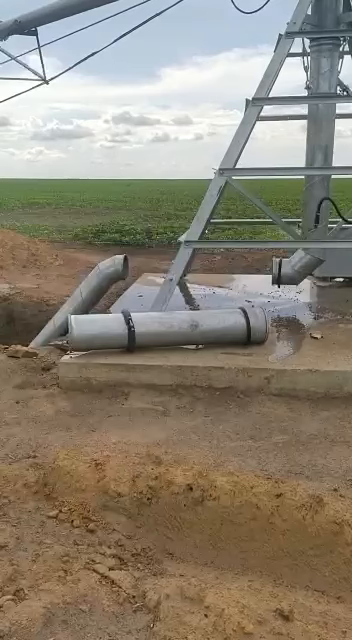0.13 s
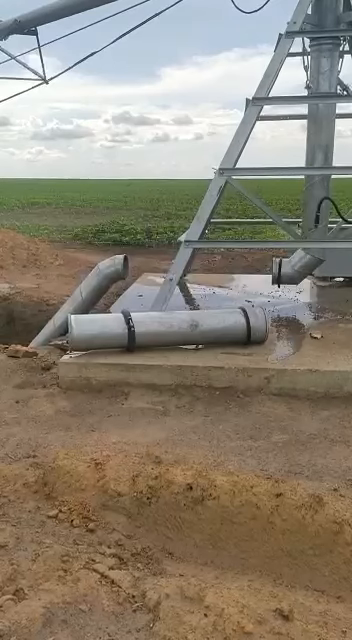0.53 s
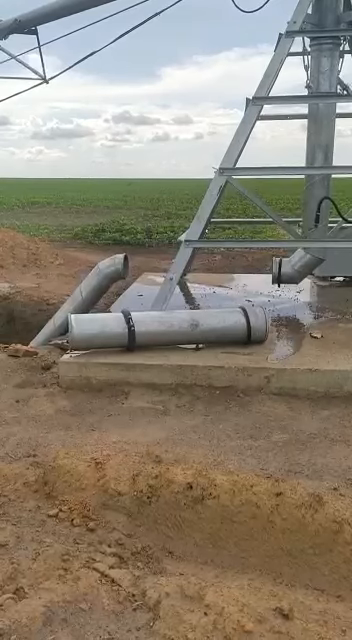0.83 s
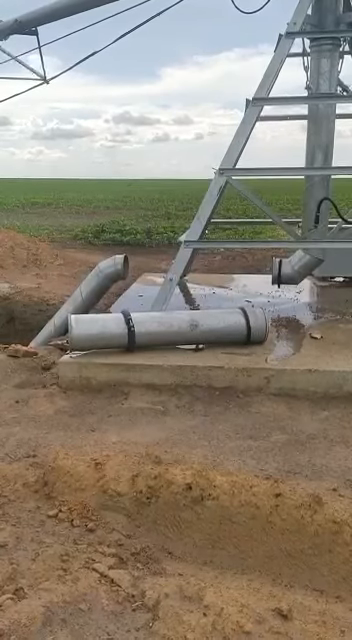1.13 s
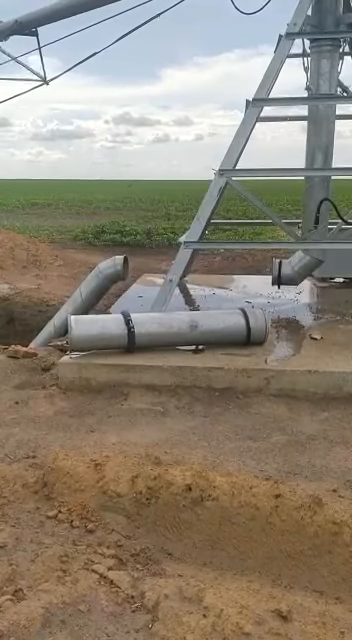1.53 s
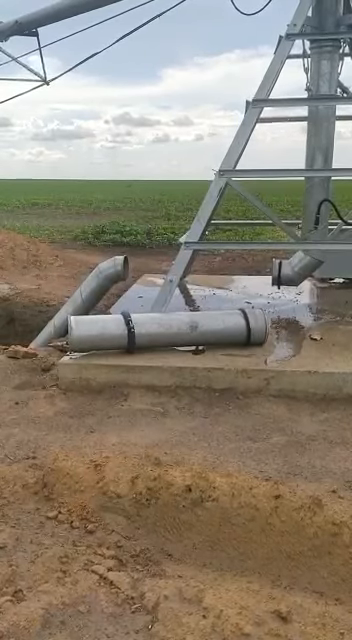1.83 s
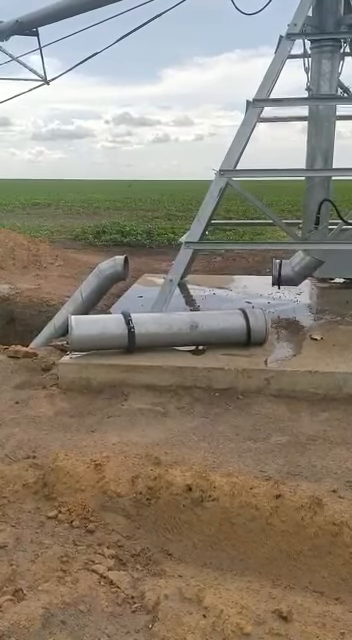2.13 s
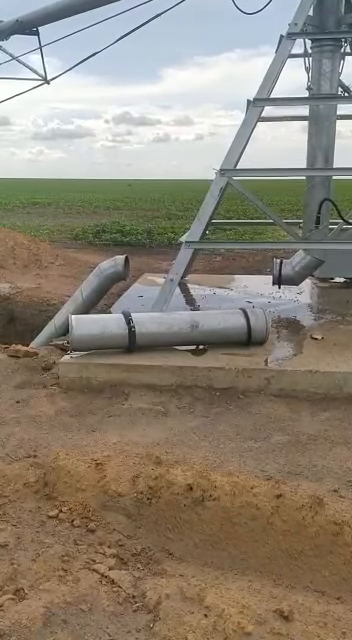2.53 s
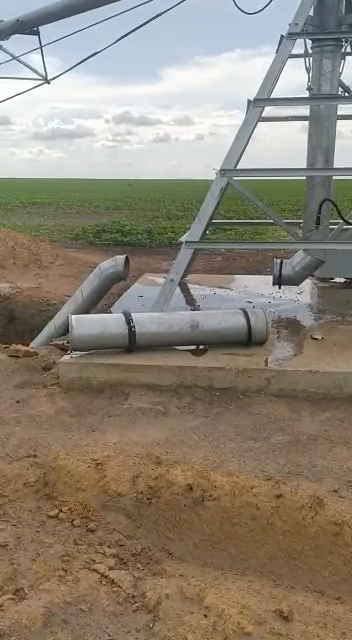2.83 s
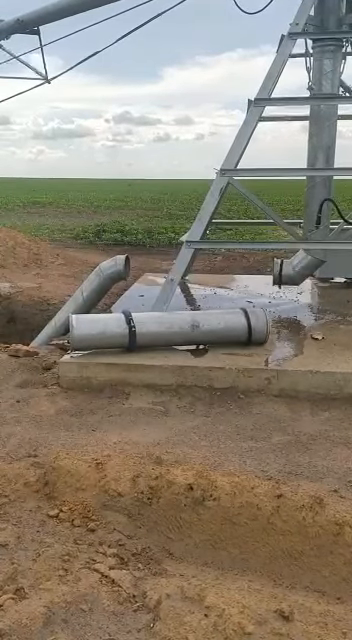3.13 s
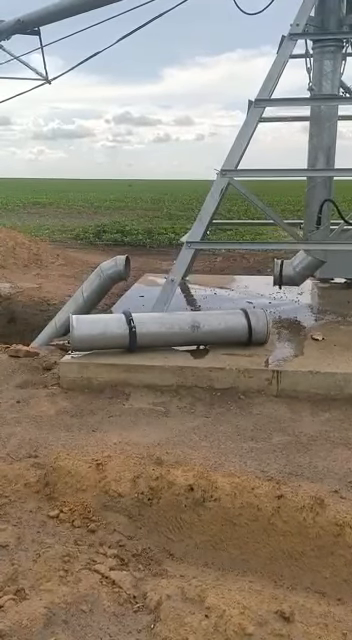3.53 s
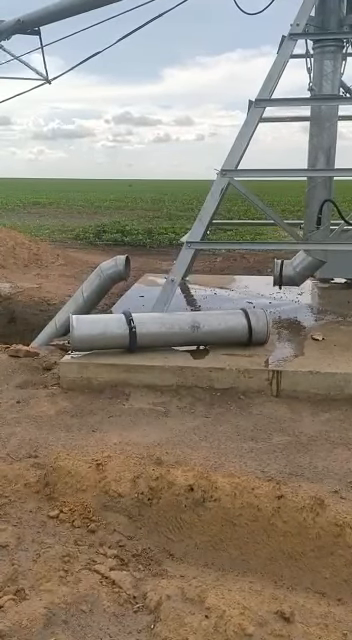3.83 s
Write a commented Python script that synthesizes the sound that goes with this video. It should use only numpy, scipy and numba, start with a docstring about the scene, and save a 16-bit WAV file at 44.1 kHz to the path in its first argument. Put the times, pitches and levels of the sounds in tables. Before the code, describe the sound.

Gusty wind buffets the microphone in an open field, mostly on the right, over a faint hiss of air from an irrigation pipe; the hiss swells briefly, then fades as hard, clipped wind thumps take over.

```python
"""Open field beside irrigation pipework, about four seconds: gusty wind, made of moving-filtered noise,
buffets the right microphone port from the start, over the faint hiss of air from a pipe mouth and a soft hush.
A first spit comes at 1.3 s; past 2.2 s the rush, coloured noise on several paths, swells briefly, and gusts
reach the left port. From 2.8 s the rush spits twice more and dies away, while the hardest wind slaps,
short swings of pressure, overload the right port."""
import sys
import numpy as np
from scipy import signal
from scipy.fft import rfft, irfft
from scipy.io import wavfile
from scipy.ndimage import uniform_filter1d
from numba import njit

SR = 44100
rng = np.random.default_rng(int(sys.argv[2]) if len(sys.argv) > 2 else 0)


def pcm_store(signal):
    """Save signal as 16-bit PCM."""
    levels = np.round(np.clip(np.atleast_2d(signal), -1, 1) * 32767)
    wavfile.write(sys.argv[1], SR, levels.astype(np.int16).T)


def voltage_ratio(decibels):
    """Convert decibels (scalar or array-like) to amplitude ratios, 20 dB per decade."""
    exponent = np.asarray(decibels, float) / 20
    return 10 ** exponent


N = 176400  # samples: 4 s


def rms_one(x):
    """Scale to an rms (average strength) of 1."""
    return x / np.sqrt(np.mean(x ** 2) + 1e-20)


def in_time(rows):
    """Turn table columns into curves with one value a sample; the first column is time in seconds."""
    s, *columns = np.transpose(rows)
    return [np.interp(np.arange(N) / SR, s, c) for c in columns]


def bandpass(x, low_hz, high_hz, order=2):
    """Keep only the sound between two frequencies."""
    return signal.sosfilt(signal.butter(order, [low_hz, high_hz], "band", fs=SR, output="sos"), x)


def drift(corner_hz):
    """Slow random wandering with spread 1: noise smoothed twice, made at a 20th of the sample rate."""
    r = np.exp(-2 * np.pi * corner_hz * 20 / SR)
    white = rng.standard_normal(N // 20 + 4002)
    slow = signal.lfilter([1], [1, -2 * r, r * r], white)[4000:]  # skip the filter's start
    return np.interp(np.arange(N) / 20, np.arange(len(slow)), rms_one(slow - slow.mean()))


@njit
def moving_lowpass(x, pole, count):
    """A chain of one-pole low-passes whose corner moves."""
    y, state = np.empty_like(x), np.zeros(count)
    for i in range(len(x)):
        v = x[i]
        for k in range(count):
            state[k] += (1 - pole[i]) * (v - state[k])
            v = state[k]
        y[i] = v
    return y


def coloured(colour, patchy_db, channels):
    """Noise in third-octave bands, each flickering on its own and a little with all the others."""
    edges = 40 * 2 ** np.arange(0, 8.6, 1 / 3)  # Hz
    out, together = 0, drift(6.0)
    white = rng.standard_normal((2, channels, N))  # neighbouring bands take turns
    hz_points, db_points = np.transpose(colour)
    for k, (low, high) in enumerate(zip(edges, edges[1:])):
        band = bandpass(white[k % 2], low, high)
        level_db = np.interp(np.log(low * high) / 2, np.log(hz_points), db_points)
        flicker = 0.38 * together + drift(18.3)
        out = out + band * voltage_ratio(level_db + patchy_db * flicker)
    return out


def wind(rows, cut_hz, order):
    """Lumpy turbulence on one port; faster eddies sound brighter."""
    lumps_db, lump_corner_hz, pitch_wander_oct = 2.5, 22, 0.12
    level_db, rate = in_time(rows)
    lump = drift(lump_corner_hz)
    wander = 0.5 * lump + drift(lump_corner_hz)  # stronger lumps also tend to be brighter
    corner = np.clip(rate, 60, 900) * 2 ** (1 + pitch_wander_oct * wander)
    # noise between two moving corners
    eddies = moving_lowpass(rng.standard_normal(N), np.exp(-2 * np.pi * 0.99 * corner / SR), count=6)
    eddies = eddies - moving_lowpass(eddies, np.exp(-2 * np.pi * 0.48 * corner / SR), count=1)
    eddies = signal.sosfilt(signal.butter(order, cut_hz, "high", fs=SR, output="sos"), eddies)
    eddies = eddies * voltage_ratio(lumps_db * lump)
    # divide by the strength over a short moment, so that the table sets the level
    power = uniform_filter1d(uniform_filter1d(eddies ** 2, size=1600), size=1600)
    return voltage_ratio(level_db) * eddies / np.sqrt(power + 1e-12)


def slaps(gusts):
    """Each strong eddy is a short, pointed swing of pressure that takes over from the smaller ones."""
    # strongest single eddies on the right port: (time [s], peak [dB], pitch [Hz])
    strong_eddies = [(0.208, -9.5, 152), (0.294, -10.5, 99), (0.364, -4, 124), (0.929, -9, 158),
                     (1.068, -6, 286), (1.103, -4.5, 122), (1.114, -1, 146), (1.218, -7.5, 135),
                     (1.31, -3.5, 164), (1.9406, 0, 165), (2.079, 0, 180), (2.8916, 2.5, 170),
                     (2.9157, 1.5, 260), (2.928, 3.5, 190), (2.9438, 2.5, 165), (3.0501, 1.5, 280),
                     (3.0621, 2, 300), (3.0677, 4, 260), (3.1335, 3, 290), (3.5437, 2, 185),
                     (3.706, 5.5, 180), (3.7768, 3, 240), (3.2305, -2.5, 260), (3.235, -1, 392),
                     (3.34, -6, 334), (3.679, -4.5, 293), (3.761, -9, 376)]
    bell_cycles, pointed, calm, soft_top = 0.8, 0.12, 0.85, 1.1
    t, out, rest = np.arange(N) / SR, np.zeros(N), np.ones(N)
    for s, peak_db, hz in strong_eddies:
        cycles = (t - s) * hz
        bell = np.exp(-(cycles / bell_cycles) ** 2)
        swing = (1 - pointed) * np.cos(2 * np.pi * cycles) + pointed * np.cos(4 * np.pi * cycles)
        out += voltage_ratio(peak_db) * bell * swing
        rest *= 1 - calm * bell
    return out + rest * soft_top * np.tanh(gusts / soft_top)  # the smaller eddies are gently limited


def ragged(pressure):
    """Strong swings tear off fine turbulence that grows with the square of the pressure."""
    fine_db, fine_hz = -31.5, 740  # dB at a pressure of 1
    fine = bandpass(rng.standard_normal(N), fine_hz / 1.74, fine_hz * 1.29)
    return pressure + voltage_ratio(fine_db) * rms_one(fine) * pressure ** 2


def right_wind():
    """Turbulence presses on the right port, with single slaps and ragged fine noise."""
    # wind on the right port, before limiting and slaps: (time [s], level [dB], eddies passing [per s])
    right_gusts = [(0.0, -56, 64), (0.04, -36.5, 120), (0.07, -18, 104), (0.11, -29.5, 95),
                   (0.21, -16.5, 61), (0.26, -34, 64), (0.29, -29, 26), (0.32, -29, 73), (0.37, -16.5, 151),
                   (0.47, -14.5, 43), (0.56, -25, 118), (0.77, -15, 103), (0.93, -23.5, 133),
                   (0.96, -27.5, 64), (1.0, -12.5, 136), (1.04, -19.5, 87), (1.11, -17, 172),
                   (1.14, -46, 120), (1.15, -51, 76), (1.22, -10, 160), (1.27, -19, 79), (1.31, -9.5, 103),
                   (1.45, -18.5, 122), (1.5, -15, 110), (1.54, -30.5, 91), (1.74, -30, 90),
                   (1.79, -16, 130), (1.94, -9.5, 136), (1.995, -13.5, 246), (2.01, -18, 89),
                   (2.08, -16, 132), (2.11, -21, 210), (2.15, -14.5, 141), (2.49, -19, 119),
                   (2.52, -21.5, 133), (2.56, -11, 184), (2.63, -16, 164), (2.69, -42, 68),
                   (2.74, -12, 108), (2.8, -12.5, 136), (2.93, -1.5, 195), (3.0, -15, 310), (3.06, -6, 236),
                   (3.13, -15, 243), (3.17, -22.5, 200), (3.23, -10, 230), (3.35, -7.5, 183),
                   (3.38, -16, 107), (3.41, -52, 220), (3.46, -12.5, 146), (3.5, -23.5, 170),
                   (3.55, -6, 175), (3.63, -20.5, 160), (3.72, -4, 190), (3.752, -15.5, 194),
                   (3.78, -10, 244), (3.818, -16.5, 157), (3.85, -11.5, 153), (3.89, -31.5, 71),
                   (3.99, -24.5, 263)]
    return ragged(slaps(wind(right_gusts, cut_hz=86.8, order=4)))


def left_wind():
    """Turbulence presses on the left port, without slaps."""
    # wind on the left port: (time [s], level [dB], eddies passing [per s], under 60 counts as 60)
    left_gusts = [(0, -42, 110), (1.7, -72, 77), (1.8, -47, 49), (2.12, -56, 41), (2.32, -22, 116),
                  (2.46, -35.5, 166), (2.58, -26.5, 154), (2.66, -31, 79), (2.78, -13.5, 170),
                  (2.89, -32, 91), (2.97, -31, 65), (3.2, -53, 85), (3.34, -34, 39), (3.39, -42, 58),
                  (3.46, -24, 47), (3.52, -42, 43), (3.58, -23.5, 54), (3.64, -40, 82), (3.86, -34, 29),
                  (3.9, -56, 46), (4, -36, 130)]
    return wind(left_gusts, cut_hz=94, order=2)


def rush():
    """Air from the pipe mouth arrives by several short paths, and scattered."""
    # level of the rush, as treble on the left port: (time [s], level [dB])
    rush_level = [(0.0, -47.5), (1.26, -47), (1.31, -45.5), (1.44, -48), (2.14, -46.5), (2.215, -34),
                  (2.36, -46), (2.42, -44.5), (2.49, -50), (2.57, -45.5), (2.65, -44), (2.73, -44.5),
                  (2.81, -56), (2.84, -54), (2.89, -54.5), (2.97, -47), (3.03, -51.5), (3.07, -48),
                  (3.11, -56), (3.2, -61.5), (3.31, -59), (3.4, -66), (3.99, -63.5)]
    # colour of the rush before its paths, relative: (frequency [Hz], level [dB per Hz])
    rush_colour = [(60, 0.5), (190, 21), (320, 5), (480, 4.5), (690, 11), (920, 5), (1150, 1), (1800, 2.5),
                   (2900, -1), (3900, 0), (4900, -8.5), (6500, -3), (10500, -13), (12500, -2.5)]
    # paths to the left port, direct and off slab and steelwork: (delay [ms], signed relative share)
    left_paths = [(0.912, 0.09), (1.092, 0.31), (1.328, 0.2), (1.504, 0.08), (1.612, -0.09), (2.38, 0.08),
                  (2.468, 0.16), (2.596, -0.14), (2.708, 0.1), (3.064, 0.08)]
    # the band that the right port favours: centre [Hz], width [Hz], boost [dB]
    right_peak = (1800, 170, 4.5)
    patchy_db, grain_db, grain_corner_hz = 2, 0.5, 180.0
    left_paths_db, right_delay_ms, scattered_db = 6, 1, -5

    level_db, = in_time(rush_level)
    grain = voltage_ratio(grain_db * drift(grain_corner_hz))
    jet, *scattered = coloured(rush_colour, patchy_db, channels=3) * grain
    hz = np.fft.rfftfreq(N, 1 / SR)

    def late(ms):
        """A delay, as a turn of phase at each frequency."""
        return np.exp(-2j * np.pi * hz * ms / 1000)

    left = voltage_ratio(left_paths_db) * sum(share * late(ms) for ms, share in left_paths)
    right = late(right_delay_ms)
    heard = rfft(jet) * np.array([left, right]) + voltage_ratio(scattered_db) * rfft(np.array(scattered))
    peak_hz, width_hz, peak_db = right_peak
    heard[1] *= voltage_ratio(peak_db * np.exp(-((hz - peak_hz) / width_hz) ** 2))
    heard = irfft(heard, N)
    left_treble = bandpass(heard[0], 1200, 11500, order=4)
    return voltage_ratio(level_db) * heard / left_treble.std()


def spits():
    """As the flow breaks up it spits: short bursts of noise in a broad resonance, alike on both ports."""
    # spits: (time [s], level at the height of the burst [dB], pitch [Hz], length [s])
    bursts = [(1.308, -49, 1500, 0.017), (2.844, -46.5, 3120, 0.011), (3.063, -46, 3550, 0.01)]
    t, out = np.arange(N) / SR, np.zeros(N)
    for s, peak_db, hz, length in bursts:
        band = bandpass(rng.standard_normal(N), hz / 1.4, hz * 1.08)
        bell = np.exp(-((t - s) / length * 2) ** 2)
        out += voltage_ratio(peak_db) * rms_one(band) * bell
    return out


def hush():
    """The far field is a steady, faintly flickering noise, separate on each port."""
    # colour of the far field, relative: (frequency [Hz], level [dB per Hz])
    hush_colour = [(60, 26), (250, 20.5), (450, 21), (750, -1), (1200, -6), (4000, 6), (12500, 6.5)]
    hush_db, patchy_db = -58.5, 1.5
    return voltage_ratio(hush_db) * rms_one(coloured(hush_colour, patchy_db, channels=2))


def scene():
    """Wind on each port (left, right) over the rush, its spits and the hush."""
    return np.array([left_wind(), right_wind()]) + rush() + spits() + hush()


def top_cut(x):
    """Nothing passes above the cut-off."""
    return signal.sosfilt(signal.butter(12, 12100, fs=SR, output="sos"), x)


def record(dry):
    """The top of the treble is cut and overloaded peaks are clipped flat."""
    cutoff_hz = 12250  # 60 dB down from here up
    cut = signal.sosfilt(signal.cheby2(14, 60, cutoff_hz, fs=SR, output="sos"), dry)
    return top_cut(np.clip(cut, -1, 1))


dry = scene()
out = record(dry)
pcm_store(out)
```